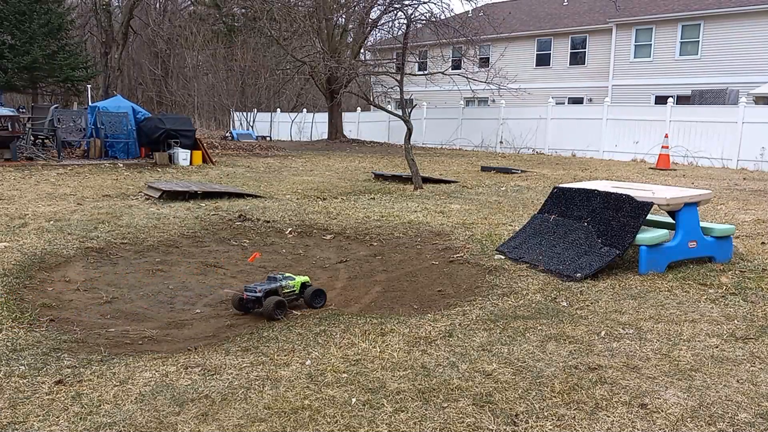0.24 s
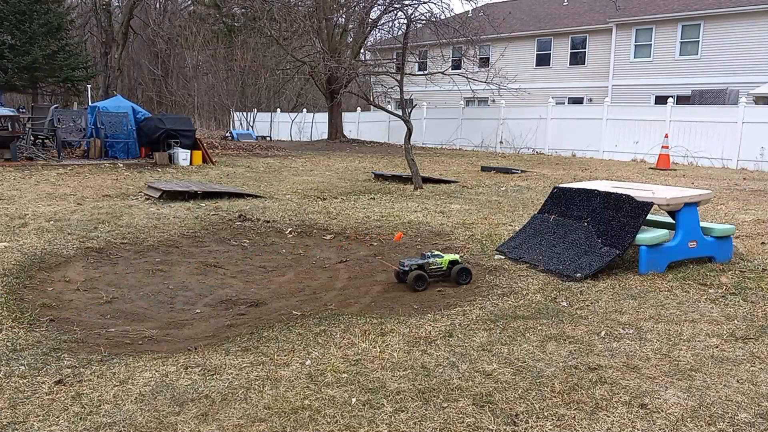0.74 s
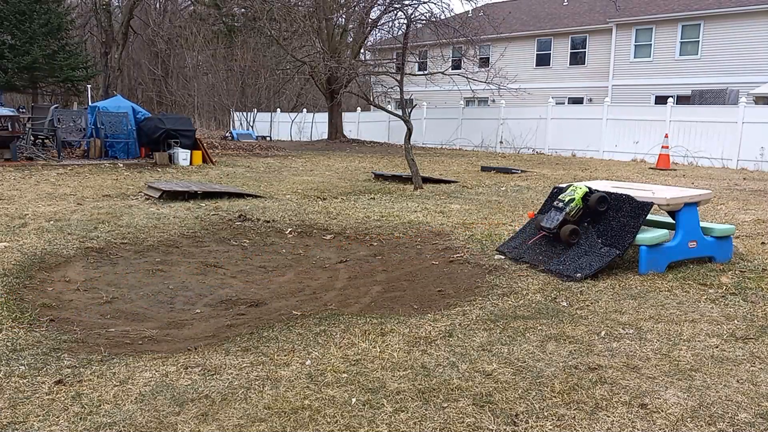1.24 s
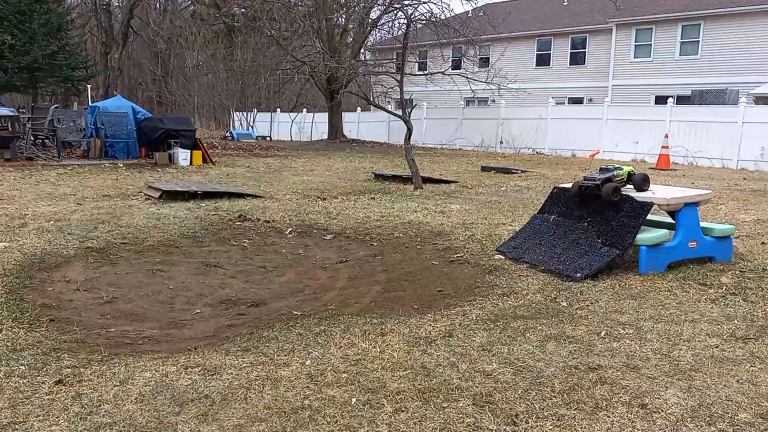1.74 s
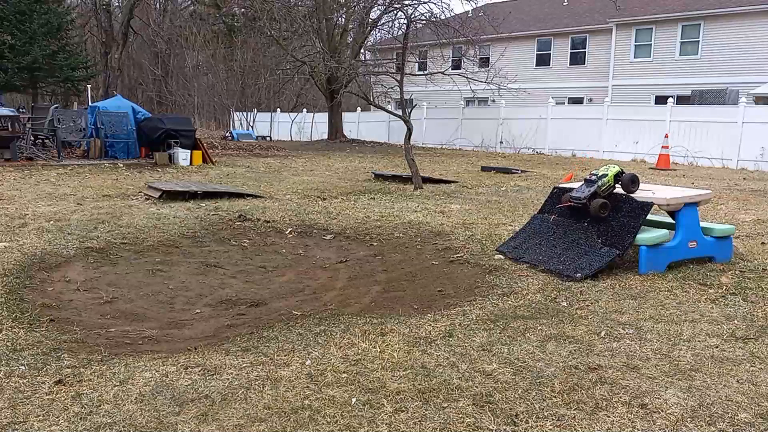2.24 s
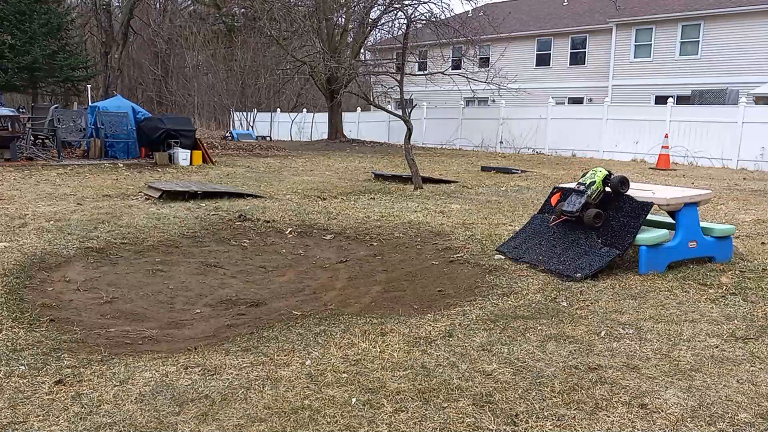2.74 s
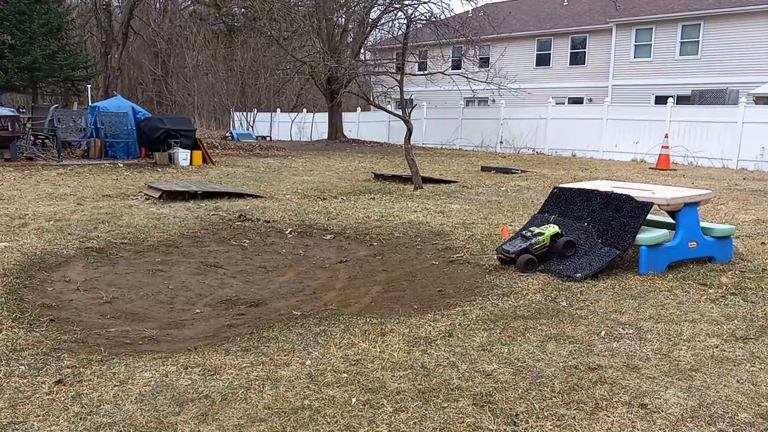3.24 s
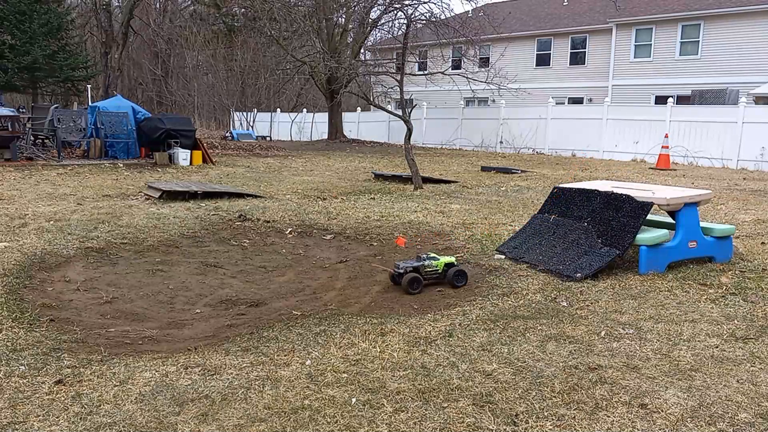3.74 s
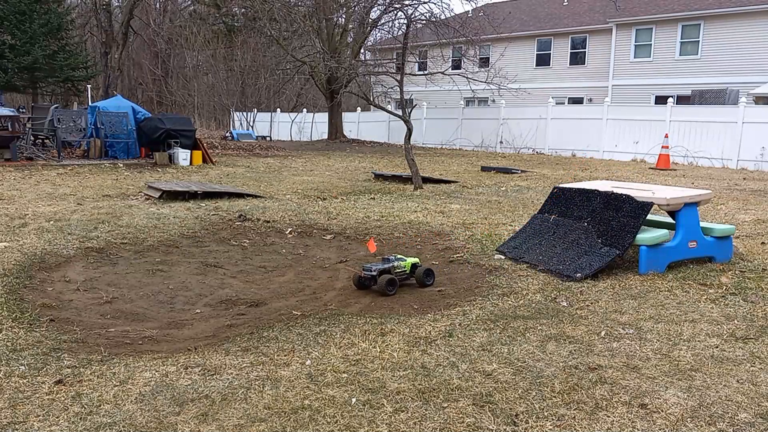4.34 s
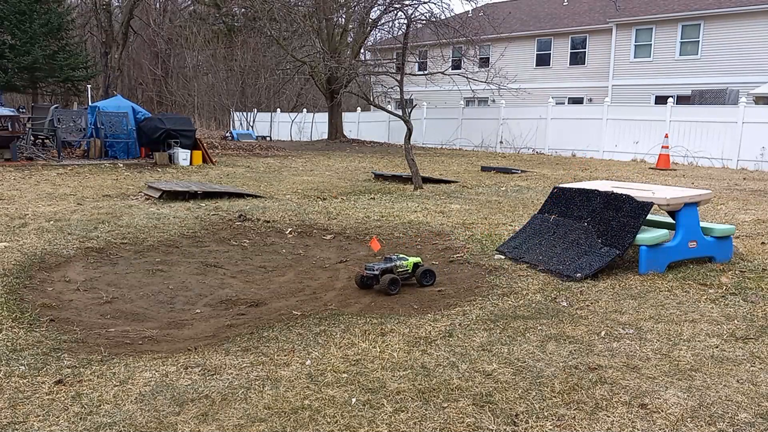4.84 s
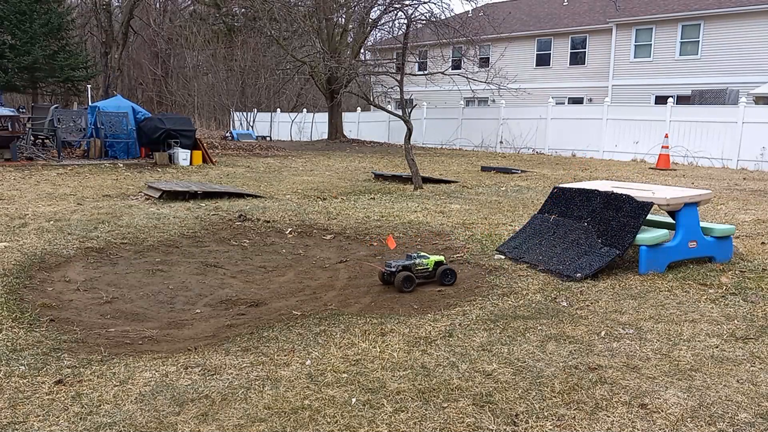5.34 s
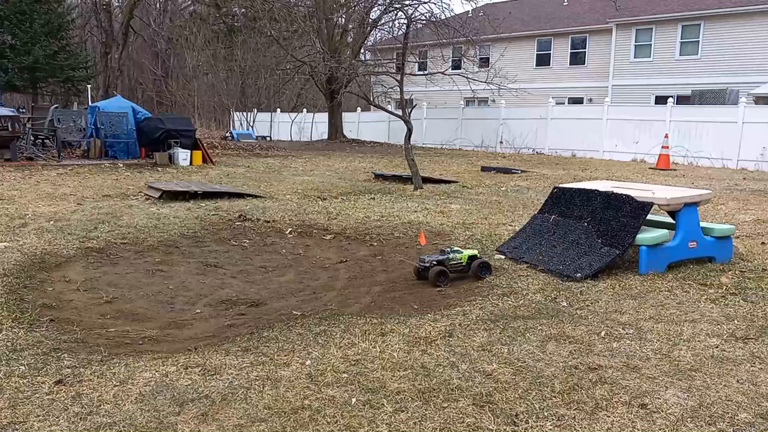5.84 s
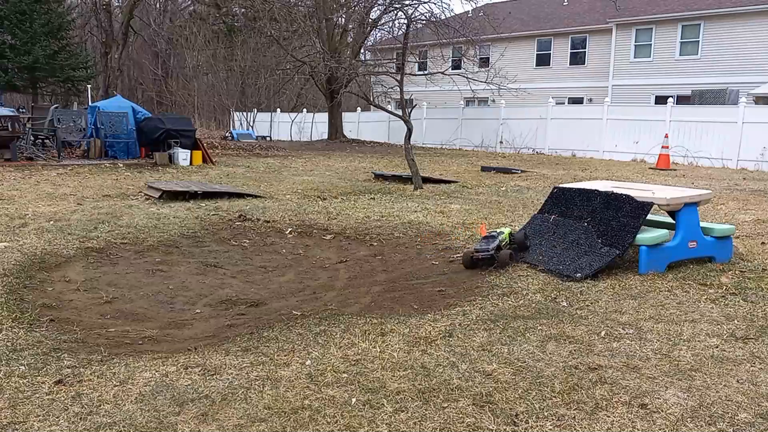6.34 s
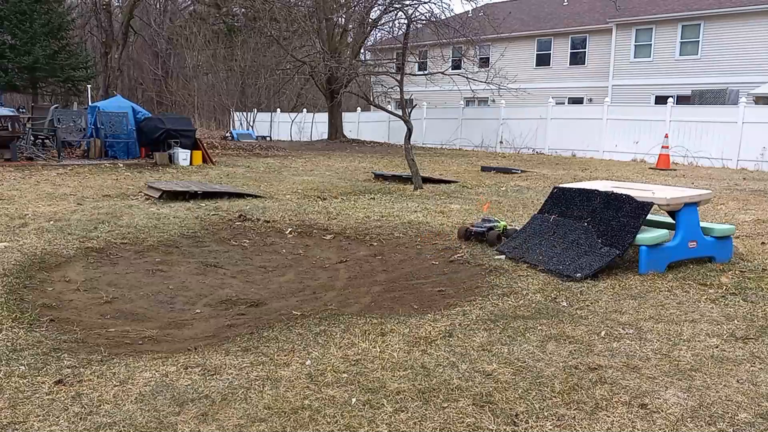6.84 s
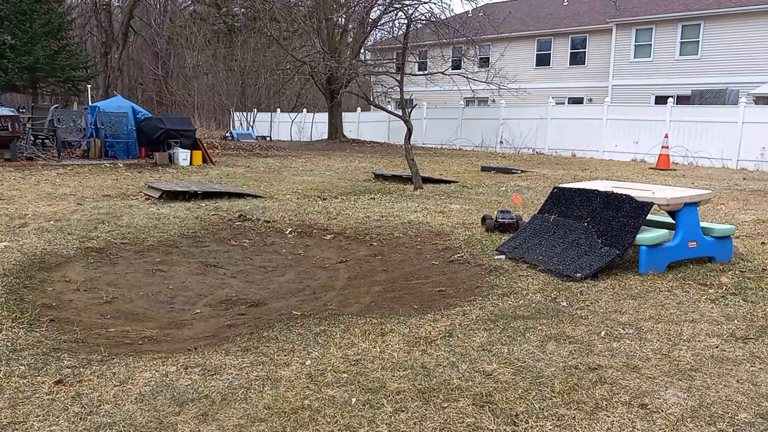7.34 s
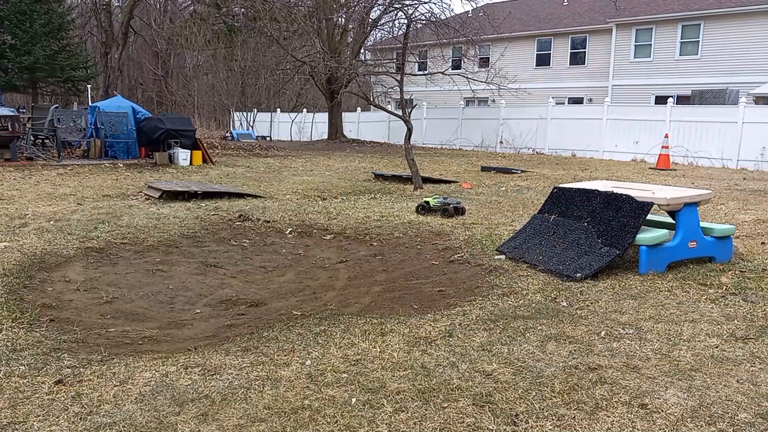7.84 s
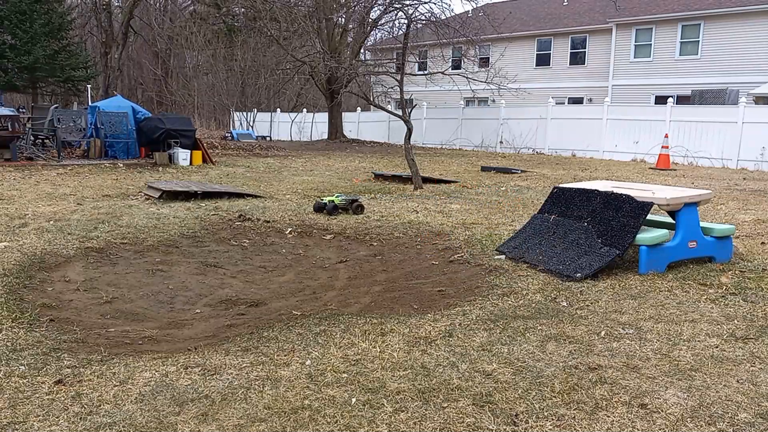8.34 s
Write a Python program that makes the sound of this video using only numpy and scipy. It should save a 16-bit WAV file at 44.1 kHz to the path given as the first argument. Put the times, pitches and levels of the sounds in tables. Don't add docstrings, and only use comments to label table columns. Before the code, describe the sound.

A small electric toy truck whines across dirt, clatters up a hollow plastic ramp, slams, then blips and circles in a breezy yard.

```python
import sys
import numpy as np
from scipy import signal
from scipy.fft import rfft, irfft, next_fast_len
from scipy.io import wavfile
from scipy.ndimage import uniform_filter1d, map_coordinates

SR = 44100
rng = np.random.default_rng(int(sys.argv[2]) if len(sys.argv) > 2 else 0)


def gain_from_db(level_db):
    decades = np.asarray(level_db, float) / 20
    return 10 ** decades


def pcm_store(signal):
    levels = np.round(np.clip(np.atleast_2d(signal), -1, 1) * 32767)
    wavfile.write(sys.argv[1], SR, levels.astype(np.int16).T)


N = 379260
TIME = np.arange(N) / SR

# start_s, level_db
WIND = [(0, -40.5), (1, -29.5), (1.8, -42), (2.2, -42), (2.7, -43), (3.2, -39.5), (4.2, -45.5), (4.6, -50),
        (5.2, -39), (5.7, -40.5), (6.3, -36), (7, -40.5), (7.5, -37), (7.9, -38.5), (8.2, -29),
        (8.6, -31.5)]
# start_s, peak_db, left_minus_right_db
GUSTS = [(5.95, -35, -6), (6.113, -34, -12), (6.328, -35.5, -25), (6.537, -34.5, -30), (6.652, -32, -17),
         (6.826, -35, -13), (6.903, -29.5, 2), (7.054, -31, 2), (7.323, -46, -5.5), (7.41, -26, -2),
         (7.585, -31, 0.0), (7.784, -30, -5), (8.062, -23.5, -5), (8.109, -16.5, 0.5), (8.177, -18.5, -7),
         (8.268, -19.5, -5), (8.358, -25.5, -10), (8.425, -24, -3), (8.536, -29, 18), (8.571, -22, -0.5)]
# frequency_hz, level_db per Hz
BUFFET = [(20, -35), (45, -9), (75, 0.5), (110, -3.5), (170, -13.5), (300, -22.5), (600, -42)]
# frequency_hz, level_db per Hz
AIR = [(60, -22.5), (150, 8.5), (300, -8), (520, -13), (1040, -16.5), (1900, -25), (2500, -35), (6000, -37),
       (16000, -47.5)]
# start_s, strongest_line_hz, level_db
PULL = [(0.05, 92.1, -33.5), (0.34, 88.6, -32), (1.8, 87.22, -28), (3.19, 86.2, -35), (3.4, 82.5, -49)]
# start_s, strongest_line_hz, level_db
CRUISE = [
    (4.7, 152.6, -54),
    (4.902, 152.6, -39.5),
    (6.0, 148.1, -46.5),
]
# multiple, level_db
PULL_ORDERS = [(1, 0), (9 / 8, -12.5), (11 / 8, -8.5), (14 / 8, -14), (1.9, -18), (7 / 8, -14.5),
               (6 / 8, -23)]
CRUISE_ORDERS = [(1, 0), (1 / 2, 0)]
# start_s, level_db
EFFORT = [
    [(0, -37), (.3, -39), (.634, -41), (.858, -30.5), (1.272, -28.5), (1.357, -28), (1.522, -35.5),
     (1.621, -36), (1.796, -43)],
    [(1.995, -32), (2.415, -32)],
    [(3.028, -53), (3.118, -53.5), (3.35, -53.5), (3.487, -49)],
    [(3.572, -48.5)],
    [(3.681, -46.5)],
    [(3.75, -49.5), (3.966, -45), (4.136, -47), (4.305, -40.5), (4.36, -45.5)],
    [(4.965, -42), (5.083, -33.5), (5.193, -37.5)],
    [(5.42, -35.5), (5.572, -32), (5.64, -41)],
    [(5.767, -34.5), (5.847, -32), (5.956, -37.5)],
    [(6.051, -35.5), (6.141, -30), (6.505, -29.5), (6.675, -36), (6.78, -39.5), (6.929, -48.5),
     (7.054, -60.5)],
    [(7.154, -40.5), (7.278, -37.5), (7.603, -34.5), (7.668, -30.5), (7.75, -33.5), (8.141, -36),
     (8.321, -44.5)],
    [(8.4, -46.5), (8.476, -45), (8.6, -41)],
]
# start_s, tooth_rate_hz
RAMP_RUN = [
    [(0, 1850), (.04, 2000), (.54, 1880), (.68, 1480), (.735, 2050), (.86, 4100), (1.022, 6100),
     (1.317, 7740), (1.5, 6160)],
    [(1.67, 5030), (1.71, 2550), (1.738, 3260)],
    [(1.952, 1200), (2.019, 3930), (2.053, 4930), (2.095, 5900), (2.147, 4930), (2.299, 4750)],
    [(3.72, 670), (3.849, 630), (3.931, 930), (4.141, 860), (4.23, 930), (4.3, 1320), (4.335, 1280)],
]
YARD_RUN = [
    [(4.971, 1350), (4.999, 1400), (5.031, 2680), (5.13, 2890), (5.18, 2150), (5.218, 1280)],
    [(5.432, 1770), (5.47, 2640), (5.54, 2950), (5.579, 2860), (5.659, 1360)],
    [(5.751, 1520), (5.769, 1610), (5.819, 3350), (5.86, 3900), (5.935, 3100), (5.968, 1880)],
    [(6, 1440), (6.05, 1560), (6.1, 2700), (6.204, 3830), (6.216, 4480), (6.3, 4620), (6.44, 5250),
     (6.53, 5900)],
    [(7.185, 2300), (7.222, 3450), (7.299, 4320), (7.391, 4150), (7.521, 4890), (7.6, 5700), (7.8, 5300),
     (8.01, 5460), (8.2, 4500)],
    [(8.415, 1520), (8.439, 1500), (8.471, 1880), (8.6, 1960)],
]
BURST_WHINE = [-1.5, 6.5, -5.5, 0, 1.5, -4, -5, 0.5, -2.5, 0.5]
# start_s, share_of_speed_lost, recovery_s
SNAGS = [(.038, .27, .045), (.12, .29, .06), (.262, .24, .14), (.431, .28, .12), (.55, .17, .1),
         (.79, .1, .03), (.89, .15, .022), (.936, .24, .06), (1.06, .17, .04), (1.17, .16, .12),
         (1.335, .13, .1), (5.031, .15, .022), (5.079, .27, .024), (5.128, .25, .028), (5.485, .14, .02),
         (5.83, .12, .03), (7.52, .1, .03), (7.631, .29, .04), (7.69, .2, .03), (7.745, .15, .03),
         (7.83, .34, .08), (7.912, .2, .024), (7.962, .21, .02), (8.006, .39, .09), (8.135, .24, .04),
         (8.497, .3, .07)]
# multiple of tooth rate, level_db at a crawl, slope_db per octave away from it
WHINE_ORDERS = [(1 / 7, -22, 4), (2, -2, -18), (3, 0, -27)]
# frequency_hz, width_hz, gain_db
CHASSIS = [(330, 60, 3), (600, 70, 5), (1530, 120, 3), (2570, 200, 6), (4150, 130, 5), (4790, 130, 4),
           (5340, 200, 7), (6580, 240, 7), (7260, 140, 4)]
# frequency_hz, level_db per Hz
GEARS = [(2200, -22.5), (3300, -4.5), (4500, -2.5), (6500, -5.5), (8000, -14.5), (9800, -16),
         (12000, -54.5)]
TYRES = [(7000, 1), (9000, -4), (9800, -4), (11700, -3.5), (14000, -5.5), (16500, -9)]
DRIVELINE = [(800, -83), (1300, 2), (2050, 7), (2900, 5), (4000, -0.5)]
SHELL = [(150, -11), (260, -2), (480, -1.5), (820, -3), (1200, -4.5), (1800, -9.5)]
# rest_db, db per 4000 Hz of tooth rate, db per db of push, on_ramp_db, behind_ramp_db
BALANCE_RULES = [
    (-10.5, 1.5, -0.03, 4.5, 1),
    (-3.5, -3.5, -0.07, 7.5, -4.5),
    (-5, -2.5, -0.28, 1.2, 2),
]
# start_s, peak_db, pitch_hz, t60_s, crack_db against peak
BUMPS = [(.86, -26, 568, 0.37, -28), (.945, -25.5, 610, 0.16, -23), (1.08, -25, 336, 0.33, -20.5),
         (1.19, -21.5, 325, 0.2, -21), (1.33, -25.5, 427, 0.21, 6.5), (1.638, -17.5, 1140, 0.092, 0.5),
         (1.655, -26.5, 695, 0.25, 1.5), (2.32, -29, 530, 0.18, -6), (2.396, -13.5, 664, 0.16, -1),
         (2.408, -10, 448, 0.16, -10), (2.425, -18, 282, 0.29, -33), (2.485, -28.5, 630, 0.14, -15.5),
         (4.446, -37, 1120, 0.062, -16), (5.85, -25, 546, .15, -33), (6.228, -15, 245, 0.13, -33),
         (6.24, -19, 500, 0.19, -10.5), (6.646, -22.5, 473, 0.14, -4), (6.667, -19.5, 4900, .1, -19),
         (8.03, -36.5, 610, 0.99, -25), (8.346, -36, 1300, 0.067, 6)]
# start_s, peak_db
TICKS = [(1.9158, -33), (1.94, -26.5), (2.645, -36.5), (2.7691, -46), (2.779, -38), (3.026, -40.5),
         (3.044, -38), (3.8407, -33.5), (4.9282, -55), (4.9517, -40), (5.397, -38)]
# frequency_hz, level_db per Hz
TICK_COLOUR = [(900, 4), (2500, 12.5), (5500, -3.5), (9000, -1), (16000, -35)]
# frequency_hz, level_db
HOLD_HIGH = [(4825, 0), (9090, -20), (10670, -21), (1830, -18)]
HOLD_LOW = [(5755, 0), (2202, 1), (8344, -18), (9738, -16)]
HOLD_BACK = [(3424, 0)]
HOLD_TOP = [(7930, 0), (5600, 0)]
# start_s, length_s, level_db, fall_db per s, partials
SERVO = [(3.105, 0.08, -54, 40, HOLD_BACK), (3.22, 0.14, -59, 64, HOLD_BACK),
         (3.814, .11, -77, 0, HOLD_TOP), (3.97, .1, -66, 0, HOLD_TOP), (4.262, 0.069, -63, 0, HOLD_TOP),
         (4.4, 0.044, -62, 75, HOLD_HIGH), (4.466, 0.062, -61, 98, HOLD_HIGH),
         (4.542, .2, -80, 44, HOLD_HIGH), (4.808, 0.061, -67, 32, HOLD_LOW),
         (4.875, .06, -72, 40, HOLD_LOW), (5.265, 0.098, -53, 24, HOLD_HIGH),
         (5.355, 0.043, -77, 50, HOLD_HIGH)]
# frequency_hz, t60_s
YARD_DECAY = [(200, .4), (2000, .25), (12000, .12)]
# start_s, left_port_lag in samples
BEARING = [(0, -6.5), (.3, -3.5), (.7, 0.23), (1.3, 7), (1.9, 7.5), (3.1, 7.5), (3.5, 4), (4.1, -0.6),
           (5.1, 0.2), (5.7, 1.7), (6.4, 4.5), (7.5, 3.5), (8.1, 1.5), (8.6, -3)]


def unit(x):
    return x / np.sqrt(np.mean(x ** 2) + 1e-20)


def along(points, hz):
    f, v = np.transpose(points)
    return np.interp(np.log(hz + 1), np.log(f + 1), v)


def curves(rows):
    s, *cols = np.transpose(rows)
    return [np.interp(TIME, s, c) for c in cols]


def wobble(rate):
    knots = rng.standard_normal(int(N * rate / SR) + 4)
    return map_coordinates(knots, [TIME * rate])


def filtered(x, response):
    m = next_fast_len(N + SR // 2)
    return irfft(rfft(x, m) * response(np.fft.rfftfreq(m, 1 / SR)), m)[..., :N]


def coloured(x, spectrum):
    closed = [(0.73, -120)] + spectrum + [(SR / 2, -120)]
    return unit(filtered(x, lambda hz: gain_from_db(along(closed, hz))))


def gate(t0, t1, edge):
    return np.clip(np.minimum(TIME - t0, t1 - TIME) / edge, 0, 1)


def wind():
    shared, left, right = [coloured(rng.standard_normal(N), BUFFET) * gain_from_db(2.5 * wobble(14)) for _ in range(3)]
    out = gain_from_db(curves(WIND)[0]) * unit(0.6 * shared + np.array([left, right]))
    for s, db, pan_db in GUSTS:
        chance = rng.random((3, 2, 1))
        cycles = (TIME - s - .012 - 0.0014 * chance[0]) * (70 + 40 * chance[1])
        turn = 2 * np.pi * cycles + 2.4 * (chance[2] - .5)
        swell = np.exp(-np.clip(1.7 * cycles ** 2, 0, 50))
        thump = (np.sin(turn) + 0.31 * np.sin(2.38 * turn)) * swell
        out += gain_from_db(db + 2 + pan_db * np.array([[.5], [-.5]])) * thump
    return out


def air():
    mid, side = [coloured(rng.standard_normal(N), AIR) for _ in range(2)]
    side = filtered(side, lambda hz: hz ** 2 / (hz ** 2 + 350 ** 2))
    return gain_from_db(-48 + 0.45 * wobble(2.2)) * np.array([mid + side, mid - side])


def engine(rows, orders):
    hz, db = curves(rows)
    turn = 2 * np.pi * np.cumsum(hz) / SR
    tone = 0
    for multiple, level in orders:
        swell = gain_from_db(level + 1.8 * wobble(7.6))
        tone = tone + swell * np.sin(multiple * turn + 0.088 * wobble(5.8) + 6 * rng.random())
    return np.sqrt(2) * gate(rows[0][0], rows[-1][0], edge=0.084) * gain_from_db(db) * tone


def effort():
    rise, fall, coast_fall, coast_db = 478, 380, 90, -14.5
    power = 1e-10
    for push in EFFORT:
        early = np.clip(push[0][0] - TIME, 0, 1)
        late = np.clip(TIME - push[-1][0], 0, 1)
        tail = gain_from_db(-fall * late) + gain_from_db(coast_db - coast_fall * late)
        power = power + (gain_from_db(curves(push)[0] - rise * early) * tail) ** 2
    return 10 * np.log10(power)


def snags():
    sag_s = .026
    return sum(share * np.interp(TIME, [s, s + sag_s, s + sag_s + back], [0, 1, 0]) for s, share, back in SNAGS)


def throttle(bursts):
    let_go_db, let_go_s = -1.5, 0.067
    on = 0
    for burst, db in zip(bursts, BURST_WHINE):
        start, end = burst[0][0], burst[-1][0]
        closing = np.clip(1 - (end - TIME) / let_go_s, 0, 1)
        on = on + gate(start - .01, end + 0.024, edge=0.0072) * gain_from_db(db + let_go_db * closing)
    return on


def motor(push_db):
    bursts = RAMP_RUN + YARD_RUN
    free_hz, = curves([row for burst in bursts for row in burst])
    lost = snags()
    hz = free_hz * (1 - lost)
    on = throttle(bursts)
    speed = hz / 4000
    gaining = np.tanh(uniform_filter1d(SR * np.gradient(np.log(free_hz)), size=900) / 6)
    db = push_db - speed + gaining - 11 * lost * speed
    wheels = uniform_filter1d(speed * (on > 0), size=4000)
    octaves = np.abs(np.log2(hz / 930))
    grip_db = np.clip(-.3 * SR * np.gradient(np.log(hz)), -2.5, 2.5) * speed ** 2
    crawl_jitter = .024 * wobble(70) + .014 * wobble(220)
    speed_jitter = .025 * wobble(55) + .022 * wobble(250)
    hz = hz * (1 + crawl_jitter + speed * speed_jitter)
    tooth = 2 * np.pi * np.cumsum(hz) / SR
    shaft = tooth / 7
    eccentric = .6 * np.sqrt(speed) * np.sin(shaft) * gain_from_db(4 * wobble(40))
    tone = np.clip(hz / 1500, 0, 1) * np.sin(tooth + eccentric) * gain_from_db((3 + 1.5 * speed) * wobble(130))
    for k, order_db, slope_db in WHINE_ORDERS:
        level = gain_from_db(order_db + slope_db * octaves + 3.5 * wobble(130))
        tone += level * np.sin(k * tooth + .3 * k * wobble(400))
    tone += gain_from_db(-17 + 5 * wobble(60)) * speed * unit(wobble(900)) * np.sin(2 * tooth)
    speed_db = 4 - 4 * speed - 4 * np.clip(1.4 - hz / 1000, 0, 1)
    return np.sqrt(2) * on * gain_from_db(db + grip_db + speed_db) * tone, shaft, wheels


def running(push_db, shaft, wheels):
    on_ramp = gate(1.1, 3.4, edge=.1)
    behind_ramp = gate(7.1, 9.1, edge=.15)
    causes = [1, wheels, np.clip(push_db + 35, -35, 10), on_ramp, behind_ramp]
    tyres_db, line_db, shell_db = [sum(db * cause for db, cause in zip(rule, causes)) for rule in BALANCE_RULES]
    jolted_db = push_db + 0.71 * wobble(9) + 2.2 * wobble(30)

    def grit(depth_db):
        return rng.standard_normal(N) * gain_from_db(depth_db * wobble(700))

    beat = 1 + .3 * np.cos(shaft)
    layers = [(GEARS, -2, beat * grit(2.45)),
              (TYRES, tyres_db, beat * grit(3.2)),
              (DRIVELINE, line_db, grit(3.1)),
              (SHELL, shell_db + 2 * wobble(23), grit(1.3))]
    near = sum(gain_from_db(jolted_db + db) * coloured(x, spectrum) for spectrum, db, x in layers)
    spray = gain_from_db(jolted_db + tyres_db - 3) * coloured(rng.standard_normal((2, N)), TYRES)
    return near, spray


def chassis(hz):
    return gain_from_db(sum(db / (1 + ((hz - c) / (w / 2)) ** 2) for c, w, db in CHASSIS))


def bumps():
    out = np.zeros(N + SR)
    t = np.arange(SR // 2) / SR
    hz = np.fft.rfftfreq(len(t), 1 / SR)
    for s, db, pitch_hz, t60, crack_db in BUMPS:
        noise = rng.standard_normal((2, len(t)))
        resonance = 1 / (1 + ((hz - pitch_hz) / (.2 * pitch_hz)) ** 2)
        hollow = unit(irfft(rfft(noise[0]) * resonance, len(t)))
        crack = unit(irfft(rfft(noise[1]) * hz / (hz + 800) / (1 + (hz / 3500) ** 2), len(t)))
        shape = (1 - np.exp(-t * pitch_hz / 4)) * gain_from_db(db - 1.5 - 60 * t / t60)
        out[round(s * SR):][:len(t)] += shape * (hollow + gain_from_db(crack_db) * crack)
    return out[:N]


def ticks():
    t60 = 0.028
    shape = 0
    for s, db in TICKS:
        decay = gain_from_db(db - 1.0 - 60 * np.clip(TIME - s, 0, 1) / t60)
        shape = shape + decay * gate(s, s + .1, edge=0.002)
    return shape * coloured(rng.standard_normal(N), TICK_COLOUR)


def servo():
    out = np.zeros(N)
    for s, length, db, fall_db, partials in SERVO:
        drift = np.cumsum(9 * wobble(120)) / SR
        tone = 0
        for hz, level in partials:
            tone = tone + gain_from_db(level + 2.8 * wobble(60)) * np.sin(2 * np.pi * hz * (TIME + drift / 5000))
        out += gate(s, s + length, edge=0.0022) * gain_from_db(db + 9.0 - fall_db * np.abs(TIME - s)) * tone
    return out


def yard(x):
    out, size = np.zeros((2, N + 2 * SR)), SR // 4
    for start in range(0, N, size):
        hz, _, z = signal.stft(rng.standard_normal((2, SR // 2)), SR, nperseg=256)
        t = _
        decay = gain_from_db(-60 * t / along(YARD_DECAY, hz)[:, None])
        tail = signal.istft(z * decay, SR, nperseg=256)[1]
        wet = signal.fftconvolve(x[None, start:start + size], tail / np.linalg.norm(tail[0]), axes=1)
        out[:, start + 300:start + 300 + wet.shape[1]] += wet
    return out[:, :N]


def ports(x):
    lag = curves(BEARING)[0] / 2
    return np.array([map_coordinates(x, [np.arange(N) + side * lag], order=5) for side in (-1, 1)])


def scene():
    far = engine(PULL, PULL_ORDERS) + engine(CRUISE, CRUISE_ORDERS)
    push_db = effort()
    whine, shaft, wheels = motor(push_db)
    near, spray = running(push_db, shaft, wheels)
    body = filtered(near + whine, lambda hz: chassis(hz) * gain_from_db(-4.5))
    truck = body + bumps() + ticks() + servo()
    far_stereo = far * gain_from_db([[-.3], [.3]])
    return ports(truck) + spray + gain_from_db(-10) * yard(truck) + far_stereo + wind() + air()


def low_pass(x):
    return signal.sosfilt(signal.butter(12, 16130, fs=SR, output="sos"), x)


def record(dry):
    def notch_and_top(hz):
        return gain_from_db(-7 / (1 + ((hz - 9750) / 200) ** 2)) * (hz < 15750)

    mix = filtered(dry, notch_and_top)
    return low_pass(mix)


dry = scene()
out = record(dry)
pcm_store(out)
```